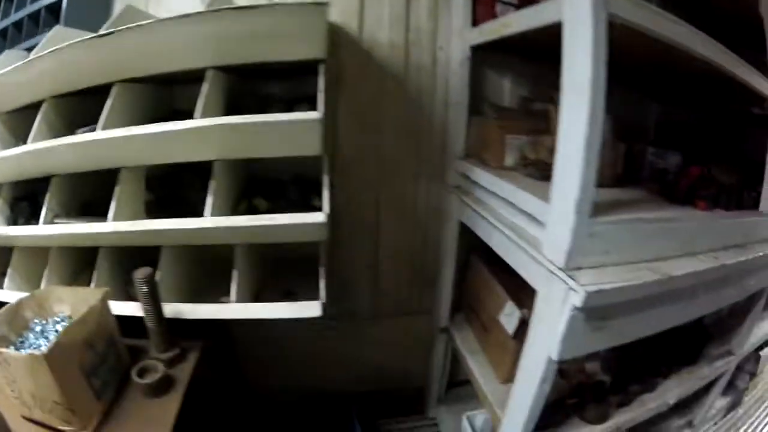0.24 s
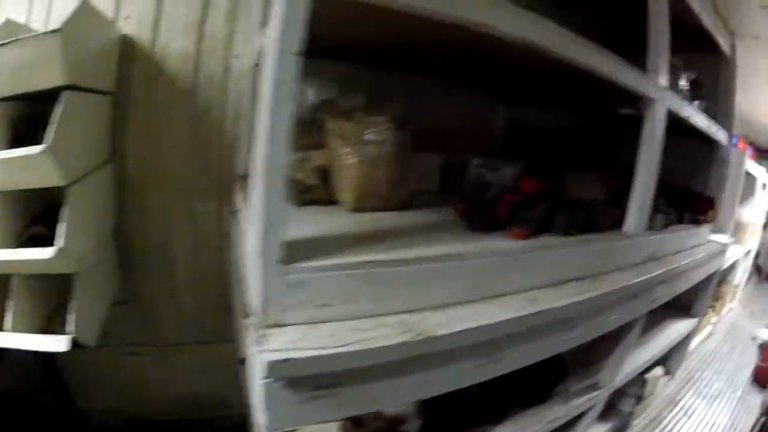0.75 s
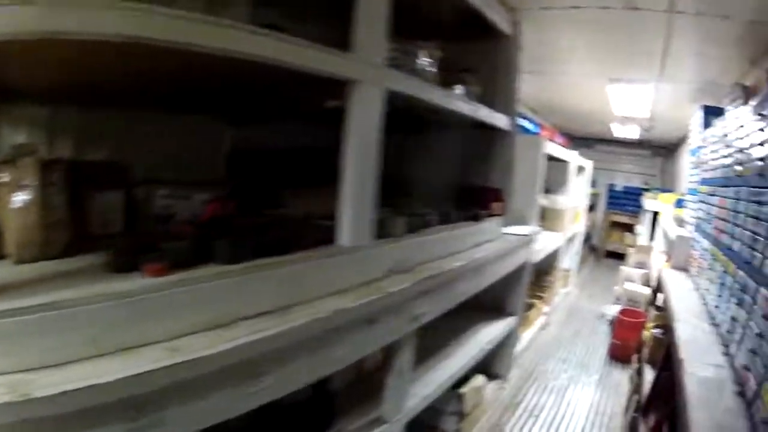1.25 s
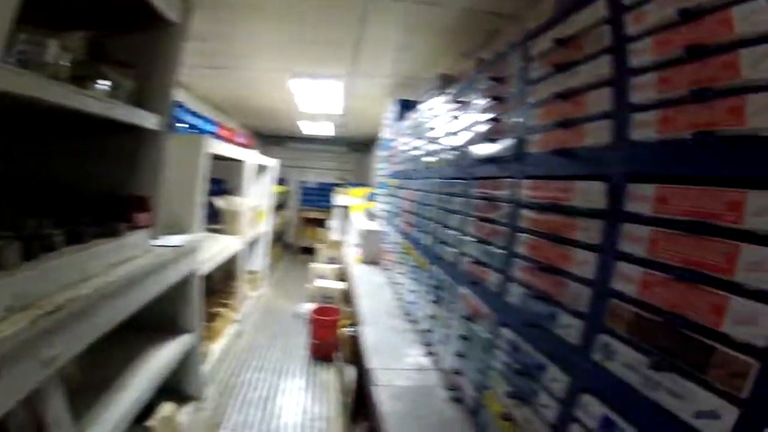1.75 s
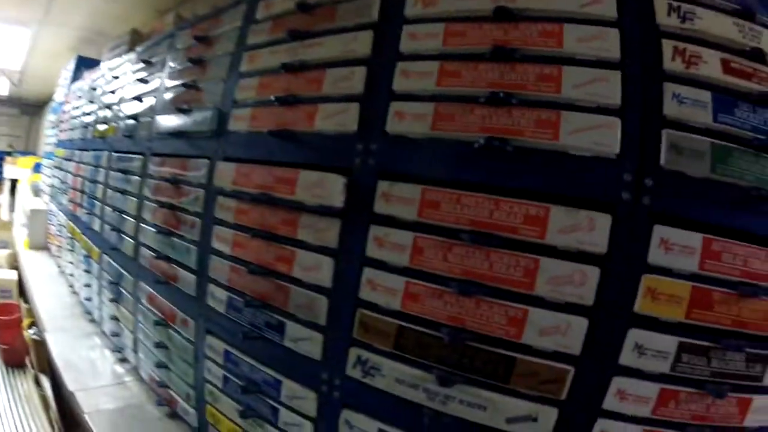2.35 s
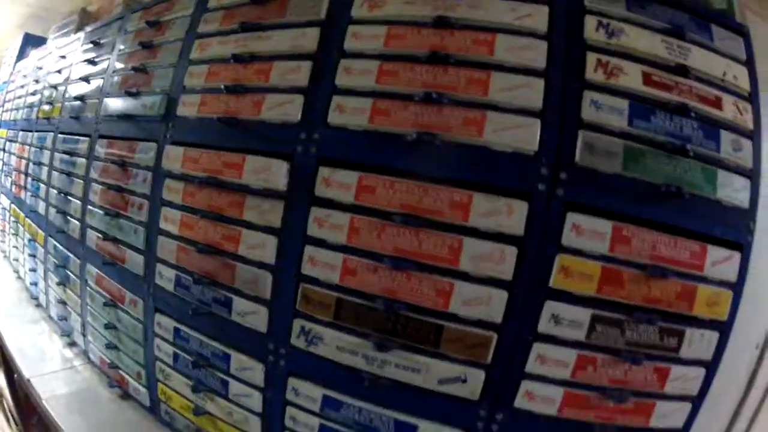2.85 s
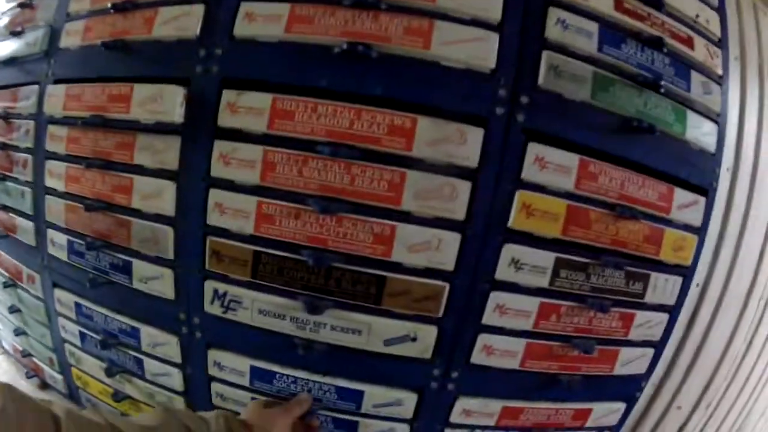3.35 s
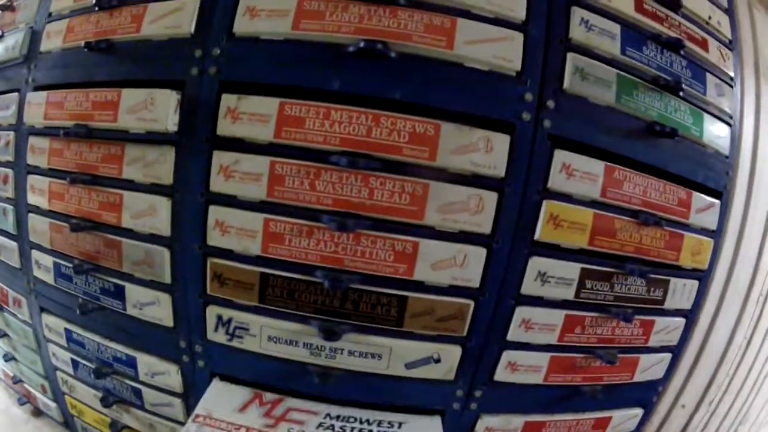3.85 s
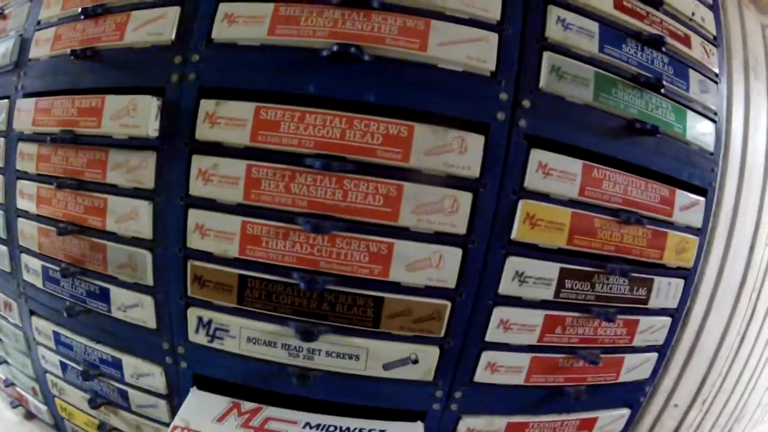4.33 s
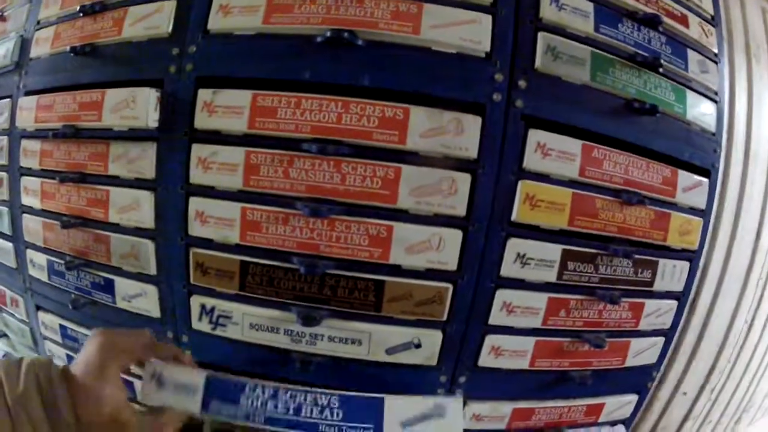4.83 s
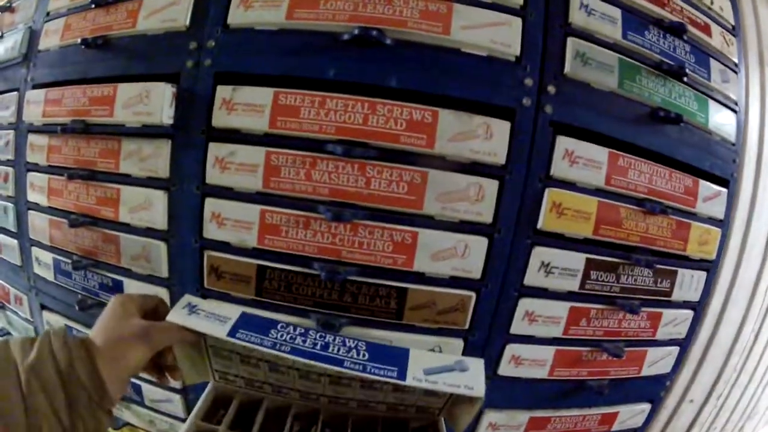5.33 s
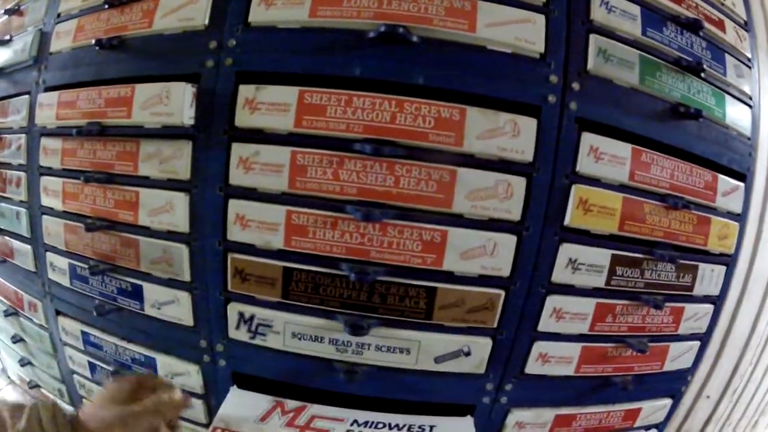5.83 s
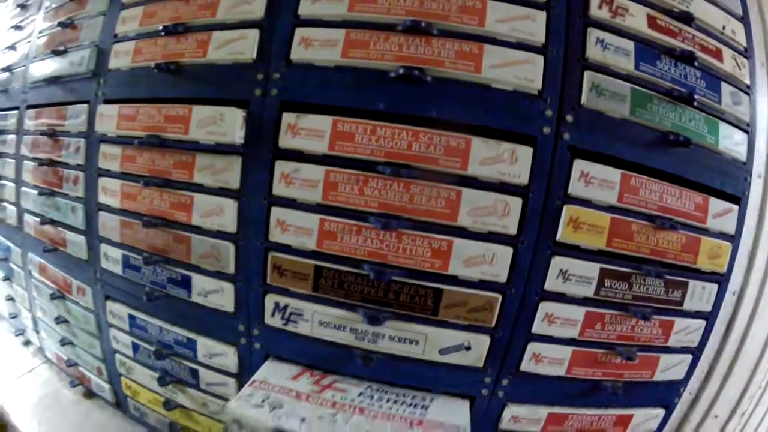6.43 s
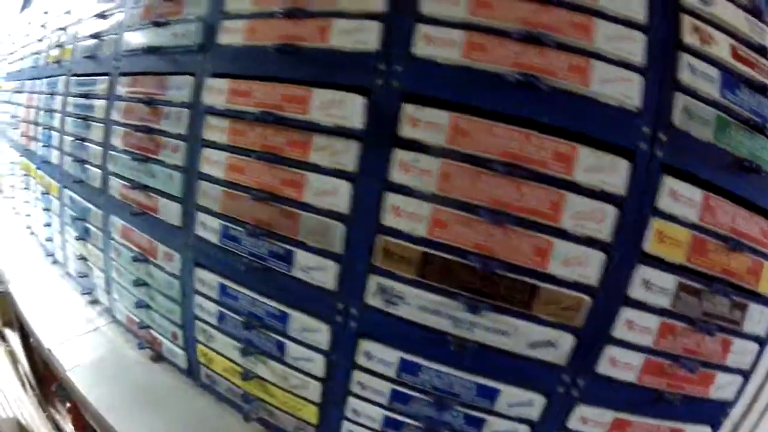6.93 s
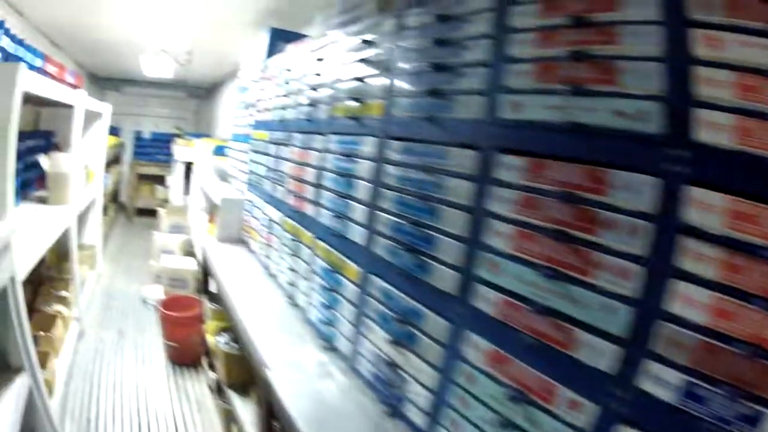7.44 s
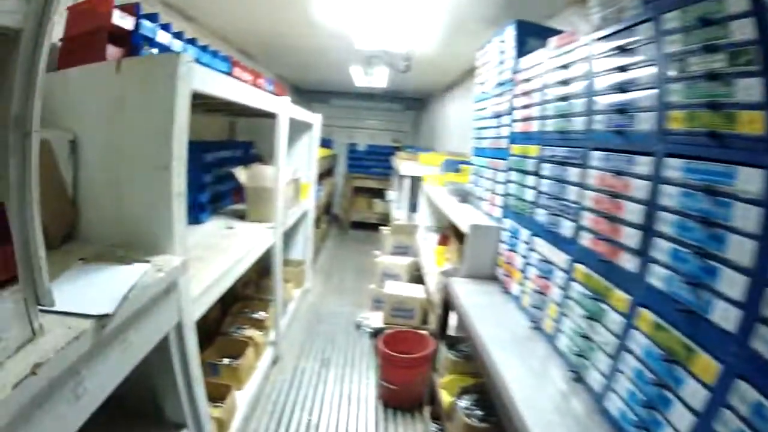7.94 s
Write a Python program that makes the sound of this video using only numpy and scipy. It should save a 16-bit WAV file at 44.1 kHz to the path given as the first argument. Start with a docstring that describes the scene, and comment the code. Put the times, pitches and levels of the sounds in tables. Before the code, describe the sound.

Boots thump on a resonant floor with soft scuffs and a few tiny metal ticks. The walker stops, pulls a heavy metal drawer that rumbles on its runners, knocks its lid open and shut, and shoves it back with a hard bang that rattles the screws. Steps then continue. Cloth rubbing and low bumps are close and dry; the narrow aisle adds a short echo, and the sound is dull.

```python
"""A jacket rustles and rubs the case of a body-worn camera; boots thud slowly down a storeroom aisle.
A steel drawer of screws is pulled out, its lid is lifted and shut, it is slammed home, and the steps go on.
Blows are decaying modes plus noise bursts, sliding and rubbing are filtered random slips, cloth is filtered noise.
A short room echo is added. The treble is muffled, and sampling at only 12 kHz mirrors a faint copy above."""
import sys
import numpy as np
from scipy import signal
from scipy.fft import rfft, irfft
from scipy.io import wavfile
from scipy.ndimage import uniform_filter1d

SR = 44100
rng = np.random.default_rng(int(sys.argv[2]) if len(sys.argv) > 2 else 0)


def unload_audio(sound):
    """Save the sound as a 16-bit wav file, at the path given as the first command line argument."""
    columns = np.transpose(np.atleast_2d(sound))
    # keep every value between -1 and 1, then stretch to whole-number steps
    steps = np.round(np.clip(columns, -1, 1) * 32767)
    wavfile.write(sys.argv[1], SR, steps.astype(np.int16))


N = 360738
TIME_S = np.arange(N) / SR
AGE_S = TIME_S[:SR // 2]  # time since a blow


def amp(db):
    """Decibels to gain."""
    return 10 ** (np.asarray(db) / 20)


def evened(x):
    """Scales to rms 1."""
    return x / np.sqrt(np.mean(x ** 2) + 1e-20)


def sized(x):
    """Scales a blow to the energy of 20 ms at rms 1."""
    return x / np.sqrt(np.sum(x ** 2) / (SR / 50) + 1e-20)


def read(points, hz):
    """Interpolates a table on a log-frequency axis."""
    point_hz, value = np.transpose(points)
    return np.interp(np.log(hz + 1), np.log(point_hz + 1), value)


def add(mix, start_s, sound):
    """Adds a sound to the mix, cut off at the end."""
    part = mix[max(round(start_s * SR), 0):][:len(sound)]
    part += sound[:len(part)]


def focus(hz, centre_hz, octaves):
    """Bell of gain around the pitch that a blow excites most."""
    return np.exp(-.5 * (np.log2((hz + 1) / centre_hz) / octaves) ** 2)


def coloured(x, spectrum, centre_hz=1000, octaves=np.inf):
    """Filters by a spectrum, optionally focused on one region."""
    hz = np.fft.rfftfreq(len(x), 1 / SR)
    gain = amp(read(spectrum, hz)) * focus(hz, centre_hz, octaves)
    return irfft(rfft(x) * gain, len(x))


def decay(time_s, t60_s):
    """Exponential decay by 60 dB in t60_s."""
    return np.exp(-np.log(1000) * time_s / t60_s)


def onset(rise_s):
    """Exponential approach to full level with time constant rise_s."""
    return 1 - np.exp(-AGE_S / rise_s)


def burst(spectrum, rise_s, t60_s, centre_hz=1000, octaves=np.inf):
    """Countless crowded modes struck together: a dying noise."""
    noise = coloured(rng.standard_normal(len(AGE_S)), spectrum, centre_hz, octaves)
    return sized(noise * onset(max(rise_s, 1e-4)) * decay(AGE_S, max(t60_s, 1e-3)))


def ring(modes, weights, stretch=1):
    """Separate modes of a body, each excited by its weight; stretch scales the ring times."""
    hz, db, t60_s = np.transpose(modes)[:, :, None]
    waves = amp(db) * np.sin(2 * np.pi * hz * AGE_S) * decay(AGE_S, t60_s * stretch)
    return sized(weights @ waves)


def grains(per_s, spread_db):
    """Tiny slips at random times; spread_db sets how uneven they are."""
    size = amp(spread_db * np.minimum(rng.exponential(1, N), 4))
    slipping = rng.random(N) < per_s / SR
    return evened(rng.standard_normal(N) * size * slipping)


def level(rows, column):
    """Gain over time, linear in dB between the rows."""
    rows = np.asarray(rows)
    return amp(np.interp(TIME_S, rows[:, 0], rows[:, column]))


def patchy(x, depth_db):
    """Rubbing keeps changing its contact: patches of pitch swell and sink for some hundredths of a second."""
    z = signal.stft(x, SR, nperseg=512)[2]
    field = uniform_filter1d(rng.standard_normal(z.shape), size=5, axis=0)
    field = evened(uniform_filter1d(field, size=5, axis=1))
    return evened(signal.istft(z * amp(depth_db * field), SR, nperseg=512)[1][:N])


# Echo decay. Each row: frequency in Hz, t60 in s.
ROOM_T60 = [(60, 0.97), (200, 0.25), (600, 0.23), (2000, 0.34), (5000, 0.32)]


def room(x):
    """Short, dense echo of a narrow aisle with full shelves: noise that decays at a rate set by pitch."""
    hz, time_s, z = signal.stft(rng.standard_normal(len(AGE_S)), SR, nperseg=256)
    z = z * decay(time_s, read(ROOM_T60, hz)[:, None])
    tail = signal.istft(z, SR, nperseg=256)[1][:len(AGE_S)]
    tail *= 1 - np.exp(-(AGE_S / 0.0066) ** 2)
    return signal.oaconvolve(x, tail / np.linalg.norm(tail))[:N]


# Body movement. Each row: time in s, jacket rustle in dB, rubbing on the camera case in dB.
MOVES = [(0.0, -53.5, -46), (0.13, -64.5, -53), (2.57, -68.5, -62), (2.8, -61.5, -50), (3.37, -64.5, -54.5),
         (3.6, -58, -47.5), (3.85, -60, -45), (4.05, -64, -53), (4.55, -69, -60), (4.97, -62, -47),
         (5.17, -72, -69.5), (5.51, -69.5, -60.5), (6.24, -64, -52), (6.49, -56.5, -43), (6.65, -51.5, -40),
         (6.84, -65.5, -57.5), (7.11, -65, -56.5), (8.18, -67, -60.5)]
# Low camera drift. Each row: time in s, level in dB.
DRIFT = [(0.0, -56), (1.91, -68), (2.0, -64), (2.62, -65), (2.76, -54), (3.35, -61), (4.03, -48.5),
         (4.31, -63), (5.97, -64), (6.51, -50), (7.34, -64), (7.47, -55), (7.72, -59), (8.18, -59)]
# Relative spectra of cloth, hollow camera case and low boom. Each row: frequency in Hz, density in dB per Hz.
JACKET_SPECTRUM = [(400, -4), (900, 2), (1500, -0.5), (2200, 1), (3000, 0), (3450, -3.5), (3850, -2.5),
                   (4250, -5), (4750, -2), (5400, -9), (6200, -18.5)]
CASE_SPECTRUM = [(60, -13.5), (170, 1.5), (280, 4), (420, 3.5), (515, 3.5), (610, -2), (760, -12),
                 (950, -53), (2000, -48)]
BOOM_SPECTRUM = [(15, -7), (50, 2.5), (85, 2), (130, -4), (250, -13.5), (600, -110)]


def movement():
    """The jacket rustles, rubs the hollow camera case and sets it drifting."""
    rustle = patchy(coloured(rng.standard_normal(N), JACKET_SPECTRUM), depth_db=1.26)
    rub = patchy(coloured(grains(per_s=1500, spread_db=0.0), CASE_SPECTRUM), depth_db=2.4)
    drift = evened(coloured(rng.standard_normal(N), BOOM_SPECTRUM))
    return level(MOVES, 1) * rustle + level(MOVES, 2) * rub + level(DRIFT, 1) * drift


# Sleeve as the arm reaches out or drops. Each row: start in s, level in dB, length in s.
SWISHES = [(2.853, -69, 0.59), (4.228, -71.5, 0.19), (5.726, -70, 0.34), (7.165, -65.5, 0.23)]


def swishes():
    """The weave of the sleeve hisses in a narrow band that swells and sinks with the arm."""
    out = np.zeros(N)
    for start_s, db, length_s in SWISHES:
        arch = np.sin(np.pi * np.arange(0, length_s, 1 / SR) / length_s)
        hiss = coloured(rng.standard_normal(N), JACKET_SPECTRUM, centre_hz=4040, octaves=0.17)
        add(out, start_s, amp(db) * arch * evened(hiss)[:len(arch)])
    return out


# Small metal parts. Each row: start in s, level in dB, pitch in Hz.
TICKS = [(0.159, -55.5, 1300), (2.305, -63.5, 5260), (2.808, -49, 5770)]


def ticks():
    """Small metal parts touch and are still at once."""
    out = np.zeros(N)
    for start_s, db, hz in TICKS:
        tick = burst(JACKET_SPECTRUM, rise_s=0.00039, t60_s=0.008, centre_hz=hz, octaves=0.49)
        add(out, start_s, amp(db) * tick)
    return out


# Soles and fingers. Each row: start in s, level in dB, centre in Hz, t60 in s.
SCUFFS = [(0.001, -49.5, 3260, 0.086), (0.067, -53, 2200, 0.23), (0.60, -59, 2000, 0.3),
          (1.193, -52, 3450, 0.2), (1.221, -47.5, 3260, 0.087), (2.809, -53, 2070, 0.13),
          (4.889, -50, 4600, .08), (5.543, -58.5, 2420, 0.18), (6.327, -45.5, 2750, 0.21),
          (7.535, -56.5, 1690, .3), (7.602, -56.5, 2800, .13)]
SCUFF_RISE_SHARE, SCUFF_OCTAVES = 0.042, 0.82  # rise as a share of t60; bandwidth


def scuffs():
    """Short brushes of rubber and skin: the longer, the softer they start."""
    out = np.zeros(N)
    for start_s, db, hz, t60_s in SCUFFS:
        brush = burst(JACKET_SPECTRUM, SCUFF_RISE_SHARE * t60_s, t60_s, hz, SCUFF_OCTAVES)
        add(out, start_s, amp(db) * brush)
    return out


# Floor modes. Each row: frequency in Hz, relative level in dB, t60 in s.
FLOOR_MODES = [(147, -11, 0.043), (176.3, 26, 0.042), (242.5, -8.5, 0.19), (226, -4, 0.019),
               (280.5, -7, 0.23), (305, 1.5, 0.096), (360, -2.5, 0.052), (510, -12, 0.084),
               (620, -19, 0.022)]
# Relative spectrum of dull thuds. Each row: frequency in Hz, density in dB per Hz.
THUD_SPECTRUM = [(40, -39), (110, -2), (200, 5.5), (350, -3), (550, -2), (700, -9), (900, -34), (1500, -67),
                 (5000, -72)]


def low_blow(db, hz, boom_db, soft):
    """One blow, mostly of a boot, rings the floor, shakes the shelving and leaves a low boom."""
    soft = max(soft, .3)
    boards = ring(FLOOR_MODES, focus(np.array(FLOOR_MODES)[:, 0], hz, octaves=0.18))
    boards = boards * onset(0.0019 * soft)
    shelving = burst(THUD_SPECTRUM, rise_s=0.0027 * soft, t60_s=0.16, centre_hz=hz, octaves=0.85)
    boom = burst(BOOM_SPECTRUM, rise_s=0.0049, t60_s=0.14)
    return amp(db) * (amp(-12.5) * boards + amp(-11.5) * shelving) + amp(boom_db) * boom


SWAY_RISE_S, SWAY_T60_S = 0.033, 0.97


def sway():
    """The jolted camera sways on: a long low burst."""
    return burst(BOOM_SPECTRUM, SWAY_RISE_S, SWAY_T60_S)


# Footfalls, and at 3.802 s a low bump of the sliding drawer. Each row: start in s, heel (first blow) level in dB,
# sole (second blow) delay in s, sole level in dB, thud centre in Hz, floor boom in dB,
# softness of the blow as a factor (at least 0.3 is used).
STEPS_AND_BUMP = [(0.405, -20.5, .022, -19, 255, -40, 0.61), (0.585, -23, 0.022, -25.5, 290, -47, 0.41),
                  (1.133, -32, .032, -23.5, 270, -44, 1.5), (1.190, -24.5, 0.026, -28.5, 217, -43.5, 4.2),
                  (1.847, -31, 0.012, -26.5, 220, -41, 1.2), (1.921, -23.5, 0.012, -25.5, 254, -42.5, 0.33),
                  (2.344, -41.5, 0.022, -43, 215, -51, 0.76), (2.585, -31, .034, -19, 333, -36.5, 1.1),
                  (2.704, -33, 0.081, -35, 228, -40.5, 1.8), (3.030, -23, .02, -16, 295, -43, 0.42),
                  (3.802, -29.5, .038, -42, 240, -37, 0.33), (6.115, -29, 0.039, -37, 220, -52, 1.7),
                  (7.309, -22.5, .076, -30, 194, -36, 0.28), (7.944, -28.5, .028, -29.5, 209, -48, 0.6),
                  (8.131, -22.5, .022, -25, 190, -42.5, 0.69)]
SOLE_PITCH, SOLE_SOFTER, SOLE_BOOM_DB = 0.88, 1.2, -2  # second blow relative to first


def steps_and_bump():
    """Heel, then a lower, softer sole, and camera sway; one drawer bump is made by the same pair of blows."""
    out = np.zeros(N)
    for start_s, first_db, delay_s, second_db, hz, boom_db, soft in STEPS_AND_BUMP:
        first = low_blow(first_db, hz, boom_db, soft)
        second = low_blow(second_db, hz * SOLE_PITCH, boom_db + SOLE_BOOM_DB, soft * SOLE_SOFTER)
        add(out, start_s, first)
        add(out, start_s + delay_s, second)
        add(out, start_s, amp(boom_db) * sway())
    return out


# Steel panel modes. Each row: frequency in Hz, relative level in dB, undamped t60 in s.
STEEL_MODES = [(1310, -5, 0.075), (1493, 11, 0.061), (1970, 0, 0.12), (2028, 12.5, 0.065), (2140, 11, 0.1),
               (2590, -23, 0.16), (2620, 5.5, 0.15), (2922, 15.5, 0.044), (3700, 6, .15), (3692, -4, 0.17),
               (4460, 3, 0.093), (4460, 13, 0.065), (5300, 18, 0.17)]
# Relative spectrum of the crack. Each row: frequency in Hz, density in dB per Hz.
CLACK_SPECTRUM = [(400, 2), (900, 1.5), (1350, 9), (1700, 0), (2100, 12), (2900, 2), (3500, 1.5), (4800, 2),
                  (5500, -4), (6200, -16)]


def clack(centre_hz, stretch):
    """Steel meets steel: a crack and a brief ring of the panels."""
    signs = rng.choice([-1., 1.], len(STEEL_MODES))
    weights = signs * focus(np.array(STEEL_MODES)[:, 0], centre_hz, octaves=0.42)
    panels = ring(STEEL_MODES, weights, stretch)
    crack = burst(CLACK_SPECTRUM, rise_s=0.00063, t60_s=0.098 * stretch, centre_hz=centre_hz, octaves=1.08)
    return amp(-6.5) * panels + amp(-3.5) * crack


# Laden box modes. Each row: frequency in Hz, relative level in dB, t60 in s before the hand damps it.
BOX_MODES = [(156.7, -1.5, 0.15), (197, -11, 0.016), (251, 8, 0.024), (304, -9.5, 0.2), (376, -3, 0.03),
             (389, -11, 0.15), (487.6, 15.5, 0.085), (517, 8.5, 0.23), (585, 6.5, 0.049), (675, 1.5, 0.17)]
KNOCK_RING, PANEL_RING = 0.7, 0.57  # the hand damps box and panels: factors on ring times
FIRM_DB, FIRM_DAMPING_DB = -31.5, 0.31  # dB of ring time lost for each dB above FIRM_DB


def thud(db, hz):
    """The hollow box and its load, struck once; a firmer hand damps more."""
    stretch = KNOCK_RING * amp(-FIRM_DAMPING_DB * max(db - FIRM_DB, 0))
    weights = -focus(np.array(BOX_MODES)[:, 0], hz, octaves=0.23) - .04
    box = ring(BOX_MODES, weights, stretch) * onset(0.0041)
    contents = burst(THUD_SPECTRUM, rise_s=0.0032, t60_s=0.1 * stretch, centre_hz=hz, octaves=0.87)
    return amp(db) * (amp(-6.5) * box + amp(-12.5) * contents)


# Box and lid. Each row: start in s, thud level in dB, thud centre in Hz, clack level in dB,
# clack centre in Hz, second contact delay in s, second contact relative level in dB.
KNOCKS = [(3.331, -28, 257, -50.5, 2420, 0.0079, -26), (3.367, -31.5, 219, -51, 2780, 0.015, 3),
          (3.425, -39, 240, -57.5, 2430, .01, -8), (3.495, -30, 202, -46.5, 3370, .008, -17),
          (4.194, -45, 500, -59, 2840, 0.0051, -2), (4.541, -41, 300, -65, 2500, 0.014, -9),
          (4.587, -40.5, 327, -62, 3100, 0.01, -3), (4.651, -41.5, 328, -80, 2100, 0.01, -8),
          (4.757, -32, 438, -60, 2800, .006, -14), (4.825, -19, 374, -42.5, 2290, .011, -2),
          (4.899, -25, 386, -44.5, 3020, .009, 3), (4.997, -12, 187, -38.5, 1650, .018, -23),
          (5.124, -27, 608, -45, 1830, 0.015, -9.5), (5.474, -37, 210, -71, 2100, 0.027, 0),
          (5.722, -34.5, 464, -68, 2700, 0.0059, -4.5), (5.961, -32, 298, -54, 2500, 0.0037, -2),
          (6.25, -19.5, 295, -48.5, 3470, 0.0053, 3), (6.347, -8.5, 573, -37, 2420, .017, -12),
          (6.388, -16, 239, -44.5, 2600, 0.01, -2.5)]
SECOND_PITCH, SECOND_CLACK_DB = 1.106, -1  # second contact: higher thud, less clack


def knocks():
    """The laden box thuds under the hand, lid and latch clack, and the loose lid touches a second time."""
    out = np.zeros(N)
    for start_s, db, hz, clack_db, clack_hz, again_s, again_db in KNOCKS:
        first_clack = amp(clack_db) * clack(clack_hz, PANEL_RING)
        add(out, start_s, thud(db, hz) + first_clack)
        second_clack = amp(clack_db + again_db + SECOND_CLACK_DB) * clack(clack_hz, PANEL_RING)
        add(out, start_s + again_s, thud(db + again_db, hz * SECOND_PITCH) + second_clack)
    return out


# Drawer out, then in: one list per slide. Each row: time in s, scrape level in dB.
SLIDES = [
    [(3.5, -50.5), (3.524, -58), (3.58, -50), (3.724, -48), (3.74, -42), (3.764, -55.5), (3.9, -65.5)],
    [(6.42, -52.5), (6.43, -57), (6.56, -47.5), (6.602, -50), (6.66, -46.5), (6.676, -48), (6.69, -47.5)],
]
# Tray rumble over the scrape: pulled in dB, pushed in dB.
TRAY_OVER_SCRAPE_DB = (6, 6.5)
# Relative spectra of runners and tray. Each row: frequency in Hz, density in dB per Hz.
SCRAPE_SPECTRUM = [(500, -17), (900, -28), (1600, -9), (2400, 6), (3000, 1), (3500, 1), (4100, -10),
                   (4900, 4), (5500, -21), (6200, -35)]
RUMBLE_SPECTRUM = [(40, -45), (150, -50), (215, 15.5), (300, -5), (400, 7.5), (580, -2), (750, -7),
                   (950, -54), (2000, -44)]


def slides():
    """The runners scrape in many small slips that ring the panels, while the tray rumbles."""
    slips = coloured(grains(per_s=2700, spread_db=-3.0), SCRAPE_SPECTRUM)
    panel_ring = ring(STEEL_MODES, rng.choice([-1., 1.], len(STEEL_MODES)))
    panels = signal.oaconvolve(slips, panel_ring)[:N]
    scrape = amp(-1.5) * patchy(slips, depth_db=2.0) + amp(-7) * evened(panels)
    jostling = coloured(grains(per_s=600, spread_db=3.0), RUMBLE_SPECTRUM)
    rumble = amp(-1.5) * patchy(jostling, depth_db=0.5)
    out = np.zeros(N)
    for rows, tray_db in zip(SLIDES, TRAY_OVER_SCRAPE_DB):
        moving = (TIME_S > rows[0][0] - .012) & (TIME_S < rows[-1][0] + .025)
        gate = uniform_filter1d(1. * moving, size=400)
        out += gate * level(rows, 1) * (scrape + amp(tray_db) * rumble)
    return out


# Load after each end stop. Each row: start in s, shudder level in dB, camera sway level in dB.
SETTLES = [(3.962, -33, -43), (6.726, -29, -37)]
SETTLE_RISE_S, SETTLE_T60_S = 0.021, .25


def settling():
    """The screws shudder in their tray after an end stop, and the arm passes the jolt on to the camera."""
    out = np.zeros(N)
    for start_s, db, sway_db in SETTLES:
        shudder = burst(CASE_SPECTRUM, SETTLE_RISE_S, SETTLE_T60_S)
        add(out, start_s, amp(db) * shudder + amp(sway_db) * sway())
    return out


PANEL_HZ = 74


def high_passed(x):
    """A high-pass below the cabinet's lowest modes."""
    return signal.sosfilt(signal.butter(2, PANEL_HZ, "highpass", fs=SR, output="sos"), x)


# Drawer hits its end stops and rebounds. Each row: start in s, thud level in dB, thud centre in Hz,
# clack level in dB, boom level in dB.
STOPS = [(3.954, -13, 380, -44, -28.5), (3.967, -39, 180, -48, -34), (3.983, -40, 400, -46.5, -38),
         (6.703, 3.5, 183, -23, -54), (6.717, -11, 195, -39, -31)]
# Cabinet modes. Each row: frequency in Hz, relative level in dB, t60 in s.
CABINET_MODES = [(112, -19, 0.033), (129, -10.5, 0.083), (161.6, -7.5, 0.082), (203.4, 8.5, 0.048),
                 (306, -3, 0.093), (327, -11.5, 0.11), (478, -10, 0.1), (594, -14.5, 0.21),
                 (704, -7.5, 0.083), (763, -6.5, 0.077)]


def stops():
    """At either end of its travel the heavy drawer shakes the whole cabinet, and the screws jump."""
    out, mode_hz = np.zeros(N), np.array(CABINET_MODES)[:, 0]
    for start_s, db, hz, clack_db, boom_db in STOPS:
        cabinet = ring(CABINET_MODES, -focus(mode_hz, hz, octaves=1.5)) * onset(0.0067)
        frame = burst(THUD_SPECTRUM, rise_s=0.00031, t60_s=0.074, centre_hz=hz, octaves=1.9)
        screws = burst(CLACK_SPECTRUM, rise_s=0.013, t60_s=0.2)
        boom = burst(BOOM_SPECTRUM, rise_s=0.0088, t60_s=0.11)
        add(out, start_s, amp(db) * (amp(-7.5) * high_passed(cabinet) + amp(-19.5) * frame))
        add(out, start_s, amp(clack_db) * (clack(centre_hz=3170, stretch=1.0) + amp(-11) * screws))
        add(out, start_s, amp(boom_db) * boom)
    return out


def scene():
    """Steps, bump and small contacts echo more than the drawer; the jacket, right at the camera, stays dry."""
    jacket = movement() + swishes()
    steps_and_contacts = ticks() + scuffs() + steps_and_bump()
    drawer = knocks() + slides() + settling() + stops()
    echo = room(amp(-8.5) * steps_and_contacts + amp(-13.5) * drawer)
    return (jacket + steps_and_contacts + drawer + echo)[None]


SAMPLER_HZ, EDGE_HZ = 12000, 15400


def record(dry):
    """Each 12 kHz sample is held until the next, which mirrors a faint copy into the treble up to EDGE_HZ."""
    held = np.repeat(signal.resample_poly(dry[0], SAMPLER_HZ, SR), 4)
    wide = signal.resample_poly(held, SR, 4 * SAMPLER_HZ)[:N]
    lowpass = signal.firwin(511, EDGE_HZ, window=("kaiser", 9), fs=SR)
    return signal.oaconvolve(wide, lowpass, "same")[None]


dry = scene()
out = record(dry)
unload_audio(out)
```